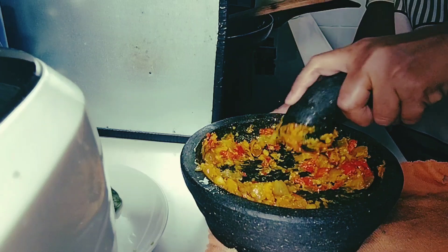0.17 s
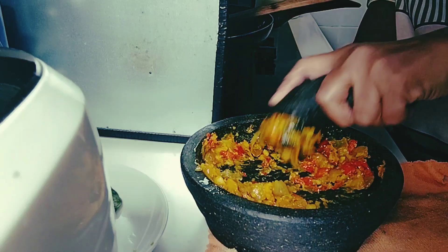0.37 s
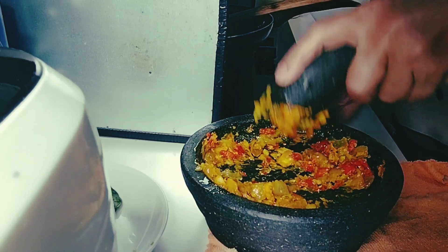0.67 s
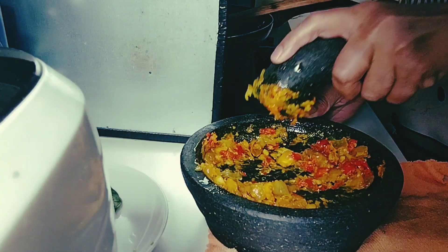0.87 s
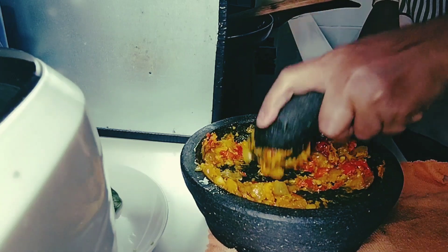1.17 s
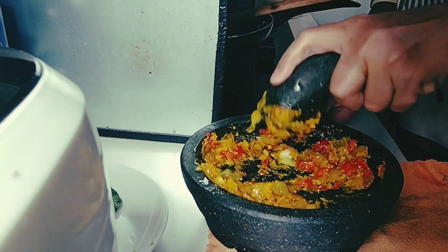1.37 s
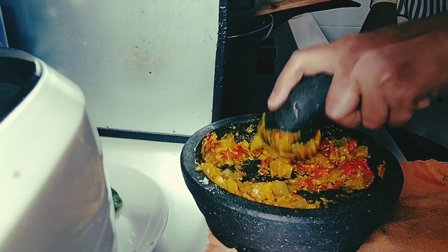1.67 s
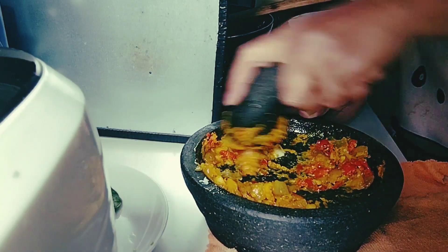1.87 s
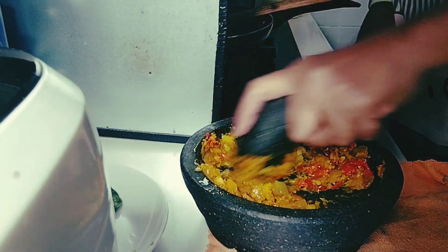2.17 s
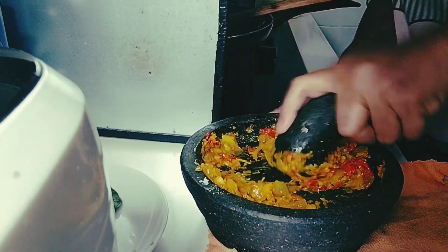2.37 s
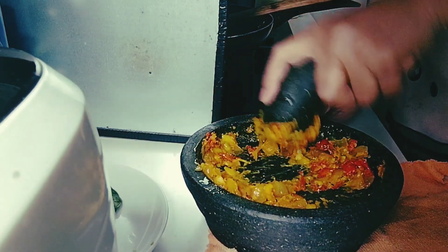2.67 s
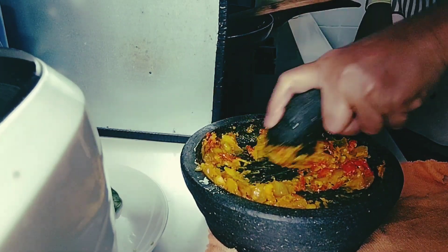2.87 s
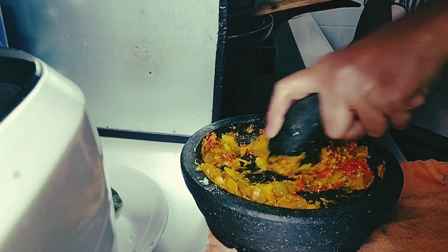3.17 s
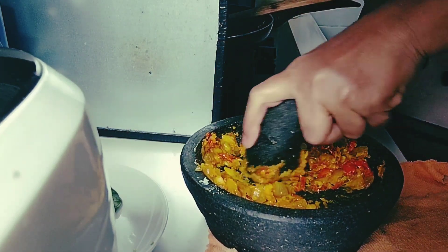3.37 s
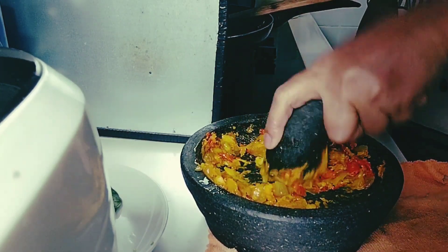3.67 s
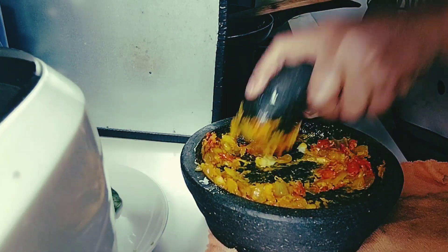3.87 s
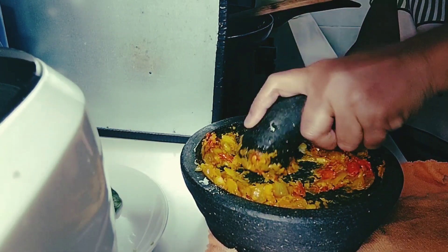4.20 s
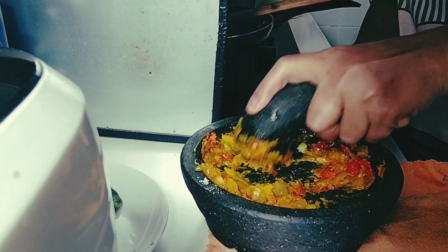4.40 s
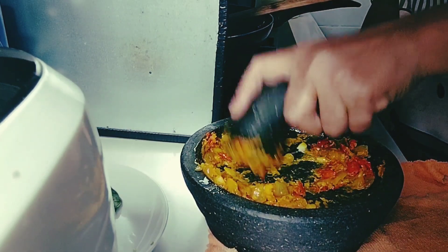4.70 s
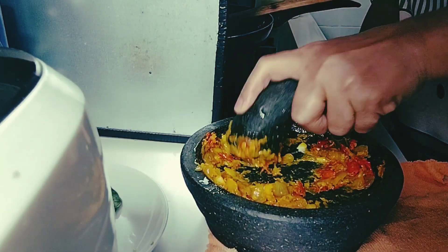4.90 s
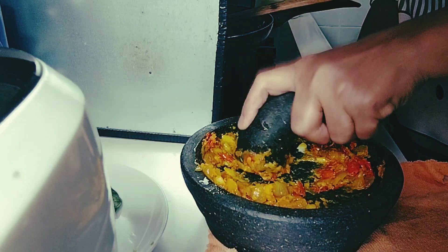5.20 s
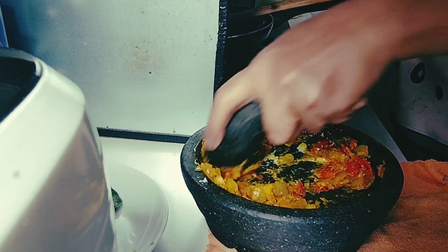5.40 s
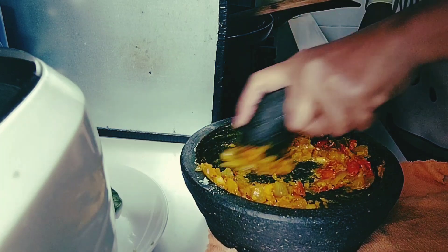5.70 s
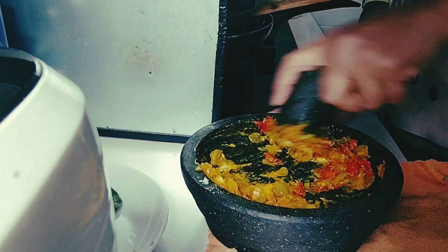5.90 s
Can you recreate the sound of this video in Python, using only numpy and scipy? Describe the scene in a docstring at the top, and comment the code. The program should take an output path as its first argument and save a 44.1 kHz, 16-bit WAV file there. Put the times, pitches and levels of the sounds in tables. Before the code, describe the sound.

Close in a small kitchen, a stone pestle pounds wet paste in a heavy mortar. Three squelchy thuds come first, then fizzing smears, gritty scrapes and soft wall bumps around one deep blow. From the middle, a quicker run of knocks includes a few bright stone cracks, while a distant machine chatters faintly. Grinding returns at the end over low room rumble.

```python
"""A stone pestle pounds and smears a wet spice paste in a stone mortar on a kitchen counter.
Blows are filtered bubble noise as paste squirts aside, a force pulse into the counter's modes, and stone taps.
Between them it is pushed round the bowl: grain trains fizz, excite stone and counter, and it bumps the wall.
Steady air noise lies beneath; halfway through, a distant machine starts to chatter as pulsed resonant noise."""
import sys
import numpy as np
from scipy import signal
from scipy.fft import rfft, irfft
from scipy.io import wavfile

SR = 44100
rng = np.random.default_rng(int(sys.argv[2]) if len(sys.argv) > 2 else 0)


def dump_mix(stems):
    """Bounce the given channels to the path in sys.argv[1] as a 16-bit WAV at rate SR."""
    frames = np.atleast_2d(stems).T  # one column per channel
    limited = np.clip(frames, -1, 1)  # hard clip at full scale
    pcm = np.round(limited * 32767).astype(np.int16)
    wavfile.write(sys.argv[1], SR, pcm)


N = 266804
TIME = np.arange(N) / SR
HZ = np.fft.rfftfreq(N, 1 / SR)


def amp(db):
    """Decibel definition: 20 dB is a tenfold amplitude."""
    return 10 ** (np.asarray(db) / 20)


def unit(x):
    """Normalization to a root-mean-square value of 1."""
    return x / np.sqrt(np.mean(x ** 2) + 1e-20)


def read(points, hz):
    """Linear interpolation of a spectrum on a log-frequency axis."""
    f, value = np.transpose(points)
    return np.interp(np.log(hz + 1), np.log(f + 1), value)


def add(mix, start_s, sound):
    """Superposition: a sound is summed into the mix from its start time."""
    part = mix[round(start_s * SR):][:len(sound)]
    part += sound[:len(part)]


def colour(x, points):
    """Spectral shaping: a zero-phase filter that keeps the power of white noise."""
    return irfft(rfft(x) * unit(amp(read(points, HZ))), N)


def low_cut(x, hz):
    """Radiation efficiency: a small body radiates little below a cutoff frequency."""
    return signal.sosfilt(signal.butter(2, hz, "highpass", fs=SR, output="sos"), x)


def drift(limit_hz):
    """Band-limited random fluctuation: noise below limit_hz, of rms 1."""
    return unit(irfft(rfft(rng.standard_normal(N)) * (HZ < limit_hz), N))


def grains(per_s, spread_db):
    """Random point process: clicks of chance timing, sign and size."""
    happens = rng.random(N) < per_s / SR
    sign = rng.choice([-1, 1], N)
    size = amp(spread_db * np.minimum(rng.exponential(1, N), 4))
    return unit(happens * sign * size)


def ring(modes):
    """Modal superposition: a tapped body answers as a sum of decaying cosines."""
    t = np.arange(SR // 2) / SR
    return sum(amp(db - 60 * t / t60) * np.cos(2 * np.pi * hz * t) for hz, db, t60 in modes)


# spectrum of the house rumble: (frequency [Hz], relative density [dB per Hz])
AIR_SPECTRUM = [(15, -75), (25, -33.5), (114, 1.5), (200, -6), (285, -5.5), (317, -11), (354, 0),
                (405, -11), (734, -12.5), (1130, -18), (1440, -19), (1610, -18), (2550, -22.5),
                (4490, -33.5), (16000, -43)]
# left-right likeness of the rumble: (frequency [Hz], correlation [-1 to 1])
AIR_LIKENESS = [(60, 1), (180, 0.87), (550, 0.084), (1650, -0.41), (4970, 0.22), (15000, -0.26)]


def air(level_db=-45, waver_db=1.5):
    """Partly coherent diffuse noise: the steady rumble of the house, nearly mono in the bass."""
    left, other = rfft(rng.standard_normal((2, N)))
    same = read(AIR_LIKENESS, HZ)
    right = same * left + np.sqrt(1 - same ** 2) * other
    rumble = unit(colour(irfft(np.array([left, right]), N), AIR_SPECTRUM))
    return amp(level_db + waver_db * drift(4.2)) * rumble


# the distant machine fades in and holds: (time [s], level [dB])
MACHINE_LEVEL = [(2.7, -104), (3.15, -53), (3.55, -49.5), (6.05, -49.5)]
# its speed: (time [s], stroke rate [1/s])
STROKE_RATE = [(3.68, 20.8), (3.78, 19), (4.31, 19), (4.41, 19.7), (5.2, 19.7), (5.35, 20.4)]
# resonances of its casing: (frequency [Hz], width [Hz], relative level [dB], depth of the chatter [0-1])
CASING_RESONANCES = [(920, 125, 1.5, 0.18), (1510, 340, -11, 0.5), (2090, 94, -4.5, 0.04),
                     (3080, 370, 0, 0.28), (4397, 44, -3.5, 0.47), (4800, 430, -4, 0.52),
                     (7400, 570, -11.5, 1), (8450, 230, -11.5, 0.6)]


def machine(hiss_db=-5):
    """Amplitude modulation: each stroke puffs noise through casing resonances, over a steady hiss."""
    level_db = np.interp(TIME, *np.transpose(MACHINE_LEVEL))
    turns = np.cumsum(np.interp(TIME, *np.transpose(STROKE_RATE))) / SR
    turns -= np.interp(4.462, TIME, turns)  # one stroke peaks at 4.462 s
    puff = np.exp(1.5 * np.cos(2 * np.pi * turns))
    beat = unit(puff * amp(2.0 * drift(6.6)))  # no two strokes are equally strong
    chatter = np.zeros((2, N))
    for centre_hz, width_hz, db, depth in CASING_RESONANCES:
        resonance = 1 / (1 + ((HZ - centre_hz) / width_hz) ** 2)
        band = unit(irfft(rfft(rng.standard_normal((2, N))) * resonance, N))
        chatter += amp(db) * band * (1 - depth * (1 - beat))
    # (frequency [Hz], relative level [dB])
    hiss_spectrum = [(100, -24), (600, 14), (2500, 0), (6000, -0.5), (10000, -5.5), (16000, -19)]
    hiss = colour(rng.standard_normal((2, N)), hiss_spectrum)
    return amp(level_db) * (unit(chatter) + amp(hiss_db) * hiss)


# the kitchen's ring: (frequency [Hz], reverberation time t60 [s])
ROOM_DECAY = [(100, 0.36), (350, 0.4), (1500, 0.24), (5000, 0.21), (10000, 0.21), (16000, 0.2)]


def kitchen(x, near_db, room_db, shared, near_s=0.0037):
    """Reverberation: quick reflections off bowl and counter, then a small room's frequency-dependent tail."""
    t = np.arange(SR // 2) / SR
    taps = rng.choice([-1., 1.], (3, len(t))) * (rng.random((3, len(t))) < 5000 / SR)
    # the shared part of the reflections reaches both ears alike
    taps = np.sqrt(shared) * taps[2] + np.sqrt(1 - shared) * taps[:2]
    near = taps * np.exp(-t / near_s) * (t > .0004)
    late = taps * np.clip(t / 0.004 - 1, 0, 1)
    hz, frames_s, spectrum = signal.stft(late, SR, nperseg=256)
    decay = amp(-60 * frames_s / read(ROOM_DECAY, hz)[:, None])
    tail = signal.istft(spectrum * decay, SR, nperseg=256)[1][:, :len(t)]
    near /= np.linalg.norm(near, axis=1, keepdims=True)
    tail /= np.linalg.norm(tail, axis=1, keepdims=True)
    echo = amp(near_db) * near + amp(room_db) * tail
    return signal.fftconvolve(x[None], echo, axes=1)[:, :N]


def moving(x, near_db, room_db, count=3):
    """Equal-power crossfade: as the pestle travels, its sound fades between sets of reflections."""
    total = np.zeros((2, N))
    for k in range(count):
        share = np.cos(np.pi * (1.142 * TIME + k / count)) * np.sqrt(2 / count)
        total += kitchen(x * share, near_db, room_db, shared=0)
    return total


def ports(x, lean_db, lag_s):
    """Interaural differences: the left port hears the direct sound lag_s later and lean_db louder."""
    delay = np.exp(-2j * np.pi * HZ * lag_s)
    left, right = amp(lean_db / 2) * delay, amp(-lean_db / 2) * np.ones_like(delay)
    return irfft(rfft(x) * np.array([left, right]), N)


# the heavy bowl on the counter:
# (frequency [Hz], relative level [dB], t60 [s], share of off-centre rocking [0-1])
COUNTER_MODES = [(81.8, -19.5, 0.69, 0.085), (125, 0, 0.23, 0), (160.6, 5.5, 0.11, 0.79),
                 (209.3, -20, 0.53, 0.67), (285, 10.5, 0.034, 0), (284.5, -11.5, 0.25, 0.56),
                 (340.5, -14, 0.14, 1), (364, -1, 0.078, 0), (450, -33, 0.25, 1), (585, -52, 0.17, 0.46)]


def counter(rocking_db):
    """Modal excitation: a blow's distance from the centre sets the level of the bowl's rocking modes."""
    return ring([(hz, db + share * rocking_db, t60) for hz, db, t60, share in COUNTER_MODES])


# pestle and bowl, damped by hand and paste: (frequency [Hz], relative level [dB], t60 [s])
STONE_MODES = [(726, -43, .06), (830, 4.5, 0.094), (1060, -43, .03), (1250, 12, 0.039), (1348, 17.5, 0.018),
               (1500, 1, 0.031), (1490, -5.5, 0.012), (1893, 1, 0.035), (1990, -9, 0.076),
               (2375, -20, 0.015), (2510, 7, 0.023), (2640, -10, 0.015), (3235, -4, 0.046),
               (4170, -16, .025), (5580, -10, 0.02)]


def stone_tap(soft_hz=5000):
    """Damped modal response: the stone's ring, its top softened by a film of paste."""
    return signal.lfilter(*signal.butter(1, soft_hz, fs=SR), low_cut(ring(STONE_MODES), 900))


def stone_clacks(taps):
    """Convolution: every tap sets off the stone's impulse response, scaled to a peak of 1."""
    stone = stone_tap()
    return signal.fftconvolve(taps, stone / abs(stone).max())[:N]


def gritty_tap(t, crunch_db, crunch_s):
    """Contact excitation: an impulse and decaying noise as grit is crushed between the stones."""
    crunch = amp(crunch_db) * rng.standard_normal(len(t)) * np.exp(-t / crunch_s) / 2
    return (t == 0) + crunch


def spray():
    """Bubble noise: the dense crackle of countless bursts."""
    return grains(18000, 3)


# colour of a thin film of paste being smeared: (frequency [Hz], relative level [dB])
SMEAR_SPECTRUM = [(500, -4.5), (2000, -26), (3500, -3), (6000, -1.5), (7500, -4), (9300, 1.5), (12500, 0.5),
                  (16000, -3)]


def smear(bubbles):
    """Source filtering: bubble bursts take on the colour of a thin film."""
    return colour(bubbles, SMEAR_SPECTRUM)


# sideways bumps into the wall of the bowl while grinding:
# (time [s], thump level [dB], clack level [dB])
WALL_BUMPS = [(1.829, -31.5, -53), (1.947, -29, -42.5), (2.056, -29.5, -53), (3.037, -34, -42),
              (3.115, -32, -43), (5.322, -28, -31), (5.786, -26.5, -45)]


def bumps(contact_ms=1.47, rocking_db=-0.5):
    """Impulsive excitation: a bump nudges the bowl on the counter and ticks stone on stone."""
    thump, taps = np.zeros((2, N))
    t = np.arange(SR // 10) / SR
    force = np.exp(-(1000 * t / contact_ms - 3) ** 2 / 2)
    nudge = signal.fftconvolve(force / force.sum(), counter(rocking_db))
    for time_s, thump_db, clack_db in WALL_BUMPS:
        add(thump, time_s, amp(thump_db) * nudge)
        add(taps, time_s, amp(clack_db) * gritty_tap(t, crunch_db=-17, crunch_s=0.0062))
    return thump, stone_clacks(taps)


def pushes(rows, attack_s, release_s):
    """Envelope control: each push rises, changes steadily in level, and decays exponentially."""
    gain = np.zeros(N)
    t = np.arange(SR // 2) / SR
    for start_s, length_s, db, change_db in rows:
        hold = amp(db + change_db * np.minimum(t / length_s, 1))
        release = np.exp(-np.maximum(t - length_s, 0) / release_s)
        add(gain, start_s, np.minimum(t / attack_s, 1) * hold * release)
    return gain


# pushes through wet paste:
# (start [s], length [s], relative fizz level [dB], change of level during the push [dB])
PASTE_SLIDES = [(0.02, .02, -64, -3), (0.215, .12, -71.5, 12), (1.803, .15, -51.5, -2),
                (1.985, 0.08, -60.5, 8.5), (2.136, 0.087, -46.5, -7), (2.272, 0.13, -56, 2),
                (2.745, 0.042, -48.5, -5.5), (2.822, .13, -49.5, -7), (2.985, 0.039, -53, 3.5),
                (3.108, .11, -55.5, 0.5), (3.278, .12, -51.5, -8), (3.44, .13, -58, 3),
                (5.285, .115, -55, 5), (5.445, .2, -55, 1.5), (5.775, 0.046, -52, 3),
                (5.88, 0.13, -55, -4.5), (6.0, 0.011, -45, -3.5)]
# scrapes on bare stone:
# (start [s], length [s], relative grit level [dB], relative counter rumble level [dB])
STONE_SCRAPES = [(1.934, 0.12, -56, -46.5), (2.268, 0.17, -61, -49.5), (3.038, 0.018, -50.5, -52),
                 (3.154, 0.05, -50, -40.5), (3.27, 0.1, -51.5, -45.5), (3.435, 0.066, -56, -44.5),
                 (5.573, 0.053, -49, -38.5), (5.834, 0.1, -49.5, -37.5)]


def grinding(fizz_db=1, grit_db=-2, clump_db=3.0, pop_db=-9, slide_rumble_db=1, swell_db=-1.5):
    """Friction as random impulses: bubbles burst in paste; catching grit shakes bowl and counter."""
    fizz = pushes(PASTE_SLIDES, attack_s=.012, release_s=0.024)
    grit_rows = [(s, length, db, swell_db) for s, length, db, _ in STONE_SCRAPES]
    judder_rows = [(s, length, db, swell_db) for s, length, _, db in STONE_SCRAPES]
    grit = pushes(grit_rows, attack_s=.013, release_s=0.011)
    judder = pushes(judder_rows, attack_s=.013, release_s=0.011)
    clumps = unit(amp(clump_db * drift(45)))
    catches = grains(1000, 2.3) * clumps
    # a few bubbles are large enough to tick on their own
    bubbles = grains(5000, 3) * clumps + amp(pop_db) * grains(67, 1.6)
    wet = amp(fizz_db) * fizz * smear(bubbles)
    shaking = np.hypot(amp(slide_rumble_db) * fizz, judder)
    rumble = shaking * unit(signal.fftconvolve(catches, counter(0))[:N])
    scrape = amp(grit_db) * grit * unit(signal.fftconvolve(catches, stone_tap())[:N])
    return wet, rumble, scrape


# colour of a deep heap of paste bursting: (frequency [Hz], relative level [dB])
SQUELCH_SPECTRUM = [(300, 15), (900, -5.5), (1800, 4), (3000, -1.5), (4500, 6.5), (6300, 4), (7600, -2),
                    (9500, 2.5), (12500, 2), (16000, -6)]
# colour of grit crushed between the stones: (frequency [Hz], relative level [dB])
CRACK_SPECTRUM = [(200, -26), (500, -2), (950, -9.5), (1300, 8), (2000, -3), (3300, -10), (4800, -26),
                  (16000, -13)]
# the pestle is brought down: (time [s], relative squelch level [dB], depth of paste [0-1],
# time to squeeze through it [ms], relative thump level [dB], contact width [ms],
# relative clack level [dB], off-centre rocking [dB])
PESTLE_BLOWS = [(0.9212, -21.5, 1, 5.94, -15.5, 0.64, -31.5, 7),
                (1.3096, -26, 0.5, 10.3, -18, 0.35, -37, 3), (1.5811, -28, 0.32, 7.1, -18, 0.74, -40.5, 1),
                (2.5748, -28.5, 0.14, 6.8, -11, 1.03, -55, -4), (3.796, -29.5, 0, 5.86, -13, 0.6, -29, -2),
                (4.069, -30, 0.6, 3.83, -16, 0.31, -10, -0.5),
                (4.363, -36.5, 0, 6.4, -20.5, 0.65, -37, -3.5),
                (4.6061, -39.5, 0, 5.4, -14.5, 1.26, -47.5, -0.5),
                (4.843, -32, 0, 5.4, -16, 0.62, -32.5, -1), (5.076, -26, 0.3, 4.6, -15, 0.51, -17, -1.5)]


def blows(push=0.39, squirt_s=0.002, first_touch=0.7, stone_lead_s=0.0021, crack_db=-7, crack_s=0.0055):
    """Cushioned impact: paste squirts out, then a force pulse of finite width excites the counter."""
    heap, film, thump, taps, crack = np.zeros((5, N))
    t = np.arange(SR // 10) / SR
    for time_s, squelch_db, depth, squeeze_ms, thump_db, contact_ms, clack_db, rocking_db in PESTLE_BLOWS:
        land_s = squeeze_ms / 1000
        squeeze = np.interp(t, [0, land_s / 4, land_s], [0, first_touch, 1])
        swell = squeeze * np.exp(-np.maximum(t - land_s, 0) / squirt_s)
        add(heap, time_s, amp(squelch_db) * np.sqrt(depth) * swell)
        add(film, time_s, amp(squelch_db) * np.sqrt(1 - depth) * swell)

        u = (t - land_s) / (contact_ms / 1000)
        force = np.exp(-u ** 2 / 2)
        add(thump, time_s, amp(thump_db) * signal.fftconvolve(force / force.sum(), counter(rocking_db)))
        # the sudden stop jolts the air
        jolt = 2 * push * (u ** 2 - 1) * force / (1 + contact_ms ** 2)
        add(thump, time_s, amp(thump_db) * jolt)

        touch_s = time_s + max(land_s - stone_lead_s, 0)
        add(taps, touch_s, amp(clack_db) * gritty_tap(t, crunch_db=-18, crunch_s=0.004))
        add(crack, touch_s, amp(clack_db + crack_db) * np.exp(-t / crack_s))
    wet = colour(heap * spray(), SQUELCH_SPECTRUM) + smear(film * spray())
    stone = stone_clacks(taps) + crack * colour(spray(), CRACK_SPECTRUM)
    return wet, thump, stone


# level difference of the thumps between the ports: (frequency [Hz], left minus right [dB])
THUMP_BALANCE = [(100, -1), (160, 2.5), (220, -12), (300, 0), (420, -12), (600, 5.5)]


def scene():
    """Linear superposition: direct and reflected paste, counter and stone, over the background."""
    blow_wet, blow_thump, blow_stone = blows()
    bump_thump, bump_stone = bumps()
    grind_wet, grind_rumble, grind_stone = grinding()
    wet = blow_wet + grind_wet
    low = low_cut(blow_thump + bump_thump + grind_rumble, hz=93)
    stone = blow_stone + bump_stone + grind_stone

    near_db, lean_db = -2, 1.5
    paste = ports(wet, lean_db, lag_s=-0.0003347) + moving(wet, near_db, room_db=-4.5)
    clacks = ports(stone, lean_db, lag_s=.00006) + kitchen(stone, near_db, room_db=-8, shared=0.16)
    scattered = low_cut(low, hz=236)  # the longest waves hardly scatter in a small kitchen
    thumps = ports(low, read(THUMP_BALANCE, HZ), lag_s=0.00034)
    thumps += kitchen(scattered, near_db=-5.5, room_db=-9.5, shared=0.86)
    return amp(1.5) * paste + amp(-1.5) * thumps + amp(3.5) * clacks + air() + machine()


def record(dry, edge_hz=16000):
    """Soft saturation and band limiting: loud peaks are rounded off, then a low-pass is applied."""
    rounded = dry / (1 + (dry / .85) ** 6) ** (1 / 6)
    low_pass = signal.firwin(511, edge_hz, window=("kaiser", 8), fs=SR)
    return signal.oaconvolve(rounded, low_pass[None], "same")


dry = scene()
out = record(dry)
dump_mix(out)
```